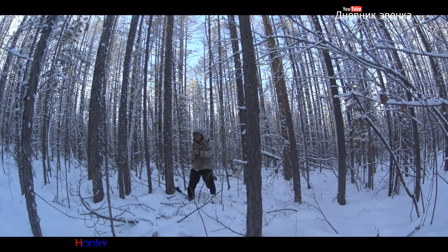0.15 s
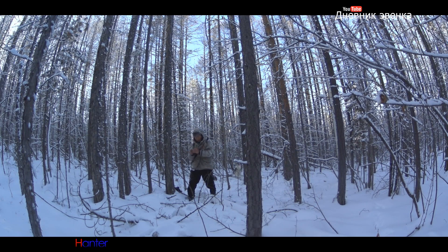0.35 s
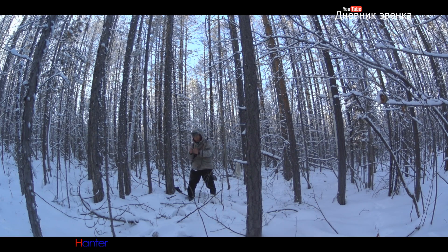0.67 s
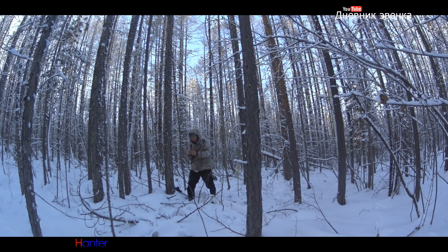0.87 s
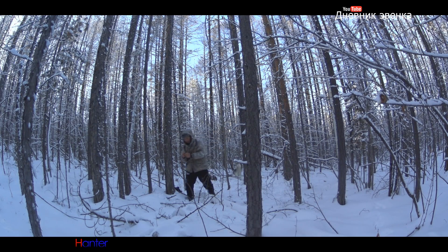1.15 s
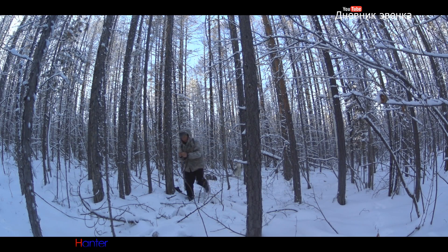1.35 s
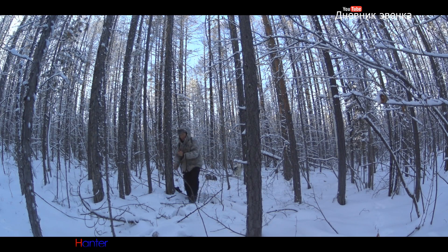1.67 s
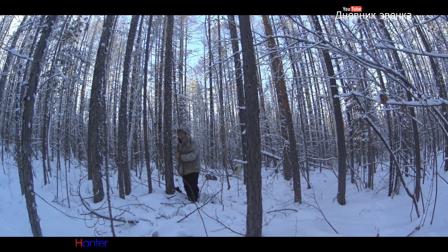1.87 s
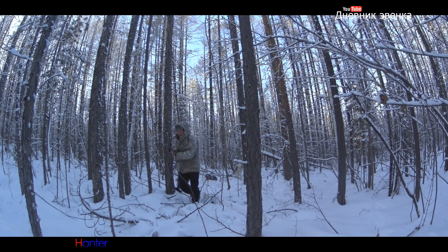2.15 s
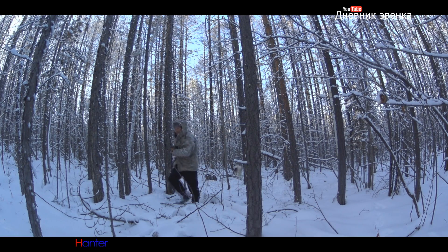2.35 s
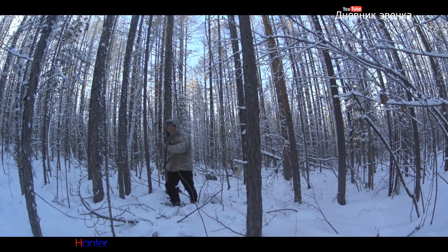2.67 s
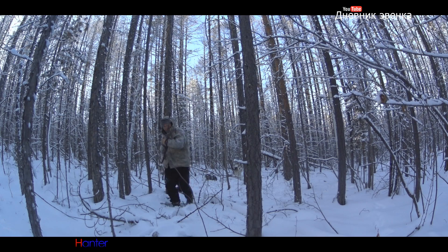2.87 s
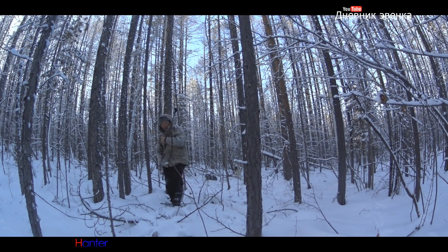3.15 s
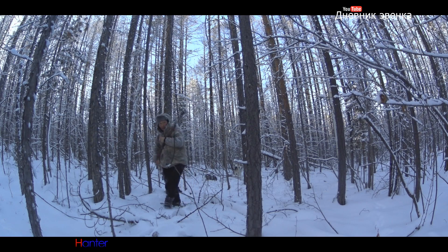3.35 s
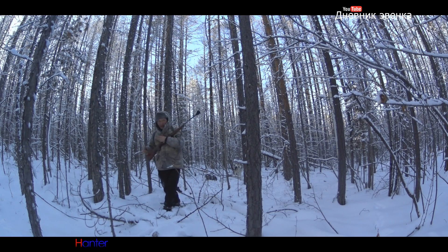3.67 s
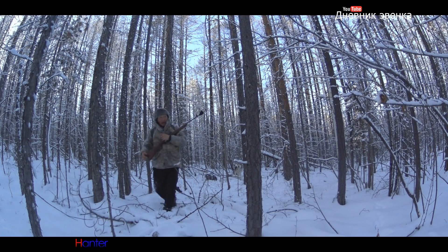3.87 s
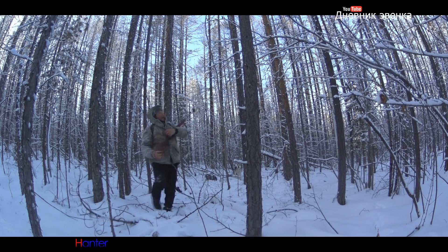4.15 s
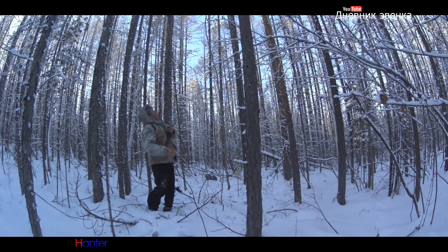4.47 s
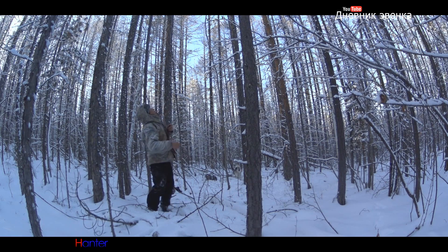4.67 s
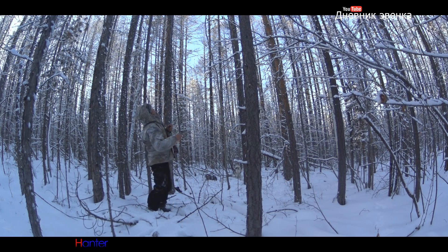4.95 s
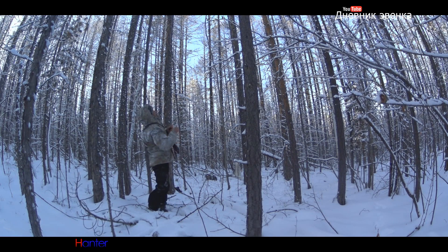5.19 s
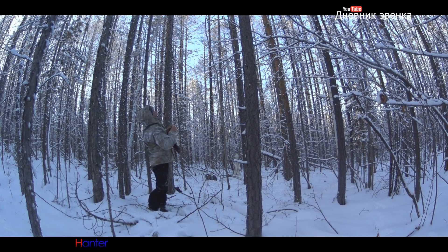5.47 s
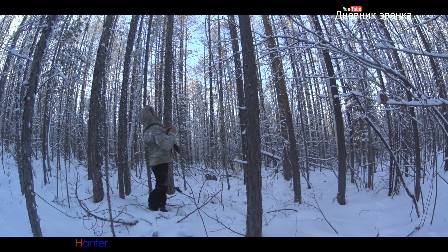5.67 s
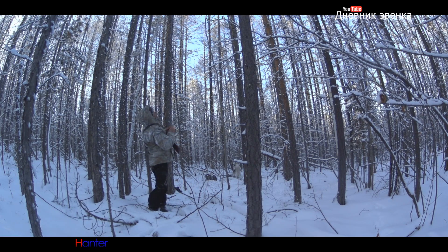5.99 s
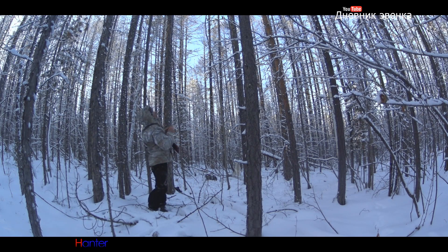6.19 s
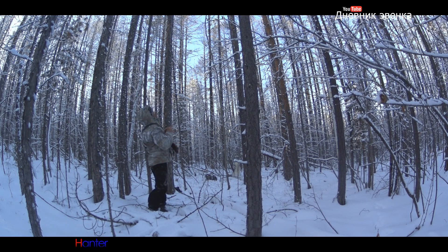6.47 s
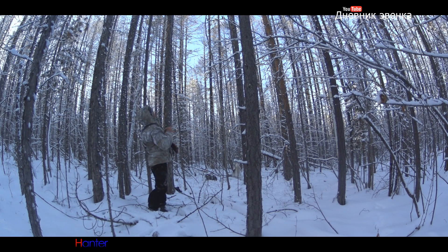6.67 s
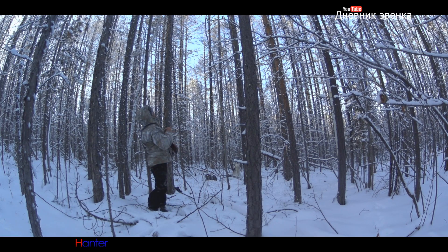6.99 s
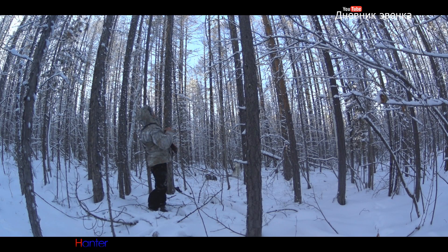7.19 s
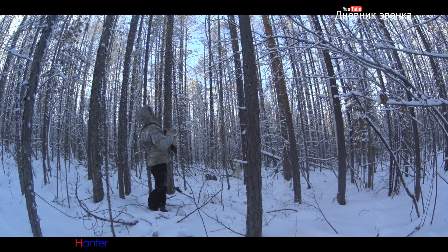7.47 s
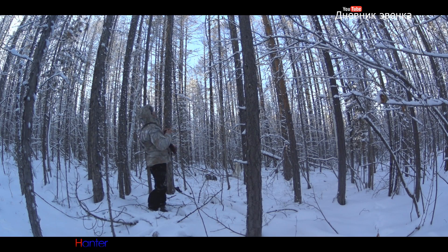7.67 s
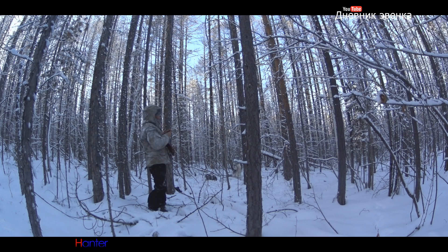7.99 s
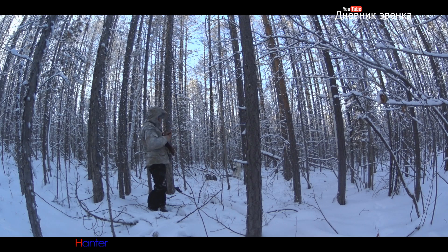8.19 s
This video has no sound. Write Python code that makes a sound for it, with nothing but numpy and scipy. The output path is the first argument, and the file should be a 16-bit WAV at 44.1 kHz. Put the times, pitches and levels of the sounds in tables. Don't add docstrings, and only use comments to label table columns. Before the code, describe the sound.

In a still snowy forest a dog some way off gives four spaced, yelping barks, each trailed by a long scattered echo off the trunks. Cloth rustles near the microphone and a twig snaps. The dog pauses while close boots crunch crusty snow with brittle ticks and sleeve swishes. Then it barks on in loose pairs to the end, with one squeak of cold snow, over faint hiss.

```python
import sys
import numpy as np
from scipy import signal
from scipy.fft import rfft, irfft, next_fast_len
from scipy.io import wavfile
from scipy.ndimage import uniform_filter1d, minimum_filter1d, map_coordinates

SR = 44100
rng = np.random.default_rng(int(sys.argv[2]) if len(sys.argv) > 2 else 0)


def volts_from_db(level):
    exponent = np.asarray(level, float) / 20
    return 10 ** exponent


def log_audio(samples):
    frames = np.atleast_2d(samples).T
    limited = np.clip(frames, -1, 1)
    pcm = np.round(limited * 32767).astype(np.int16)
    wavfile.write(sys.argv[1], SR, pcm)


N = 367353

# f/Hz, likeness/(0-1)
NEAR_ALIKE = [(60, 1), (170, 0.68), (480, 0.43), (1350, 0.44), (3810, 0.28), (10800, 0.92)]


def dog():
    # t/s, length/s, flip to head after start/s, chest return/share of length, its level/dB
    barks = [
        (-0.024, 0.16, 0.054, 0.63, -29),
        (0.519, 0.16, 0.04, 0.63, -27.5),
        (1.213, 0.16, .065, 0.55, -41),
        (2.411, 0.16, 0.044, 0.71, -30.5),
        (4.734, 0.16, .032, 0.65, -20.5),
        (5.188, .157, 0.043, 0.77, -23),
        (6.001, .162, 0.044, 0.63, -22.5),
        (6.619, 0.16, 0.054, .5, -21),
        (7.465, .163, 0.062, 0.699, -21.5),
        (7.995, 0.16, 0.041, 0.59, -22),
    ]
    # after attack f/Hz, at flip f/Hz, under the head voice f/Hz, on return f/Hz
    chest_pitch = [(385, 450, 490, 485), (481, 440, 405, 480), (490, 740, 450, 415), (519.6, 610, 420, 480),
                   (499, 510, 425, 520), (526, 580, 610, 500), (490.2, 530, 590, 590), (490, 580, 570, 630),
                   (546, 560, 470, 520), (464.6, 520, 590, 640)]
    # first f/Hz, middle f/Hz, last f/Hz
    head_pitch = [(870, 975, 900), (790, 860, 800), (930, 870, 810), (870, 930, 870), (880, 850, 900),
                  (890, 845, 780), (900, 850, 1000), (920, 770, 850), (860, 790, 1000), (870, 880, 820)]
    # chest attack level/dB, head level/dB, head change as chest returns/dB, overtone level/dB, hiss level/dB
    efforts = [(-40, -20.5, -1, -27.5, -40.5), (-29.5, -23.5, 1.5, -27, -46), (-23, -17, -1.5, -30.5, -50),
               (-27.5, -22.5, 4.5, -28, -46.5), (-25, -23.5, -8, -29.5, -42),
               (-23.5, -21.5, -0.5, -30.5, -48.5), (-20, -23, 2, -31, -49),
               (-19.5, -18.5, -6.5, -30.5, -50.5), (-22, -16, -11.5, -29.5, -49), (-23, -23, 1.5, -32, -51)]
    roughness = [.14, .3, .3, .33, .35, .5, .5, .45, .4, .6]
    facing = [2.5, -3.5, -2.5, -3.5, -1, -6, -10, -8, -9.5, -10]
    echoes = [-46.5, -48, -46.5, -47, -48, -47.5, -47, -48, -46.5, -47]
    # t/s, pulse rate/Hz, level/dB
    growls = [
        [(.46, 110, -53), (.525, 230, -52)],
        [(1.11, 113, -57), (1.22, 230, -48)],
        [(2.234, 64, -54), (2.3, 64.4, -52), (2.385, 95, -47), (2.41, 116, -40.5)],
        [(4.7, 89, -73), (4.74, 55, -45)],
        [(5.965, 103, -59), (6.01, 121, -38)],
        [(6.575, 115, -56.5), (6.625, 194, -42)],
        [(7.425, 76, -61), (7.475, 155, -36.5)],
    ]
    out, creaks = np.zeros((2, N)), np.zeros((1, N))
    phrases = map(phrase, barks, chest_pitch, head_pitch, efforts)
    for rows, rough, facing_db, echo_db in zip(phrases, roughness, facing, echoes):
        start, voice = bark(rows, rough, facing_db)
        forest(out, start, voice, wet_db=echo_db, near_db=7.0)
    for rows in growls:
        start, voice = growl(rows)
        add(creaks, start, voice[None])
    forest(out, 0, creaks[0], wet_db=-41.5, near_db=5.5)
    return out


def phrase(timing, chest_hz, head_hz, effort):
    s, length, flip, share, back_db = timing
    early, top, under, held = chest_hz
    first, middle, last = head_hz
    chest, head, sag, over, hiss = effort
    rest_hz, onset_db, attack_s = 363.75, -28, .023
    flip_s, settle_s, release_s = 0.00924, .018, 0.0271
    before_db = -31.5
    back = np.clip(share * length, flip + settle_s + .005, length - release_s - .005)
    return [(s, rest_hz, chest + onset_db, first, head + 0.87 * onset_db, over + onset_db, hiss + 0.5 * onset_db),
            (s + attack_s, early, chest, first, head + before_db, over - 4, hiss - 5.5),
            (s + flip - flip_s, top, chest - .8, first, head + 0.73 * before_db, over, hiss),
            (s + flip, top, chest - 7, first, head, over, hiss),
            (s + flip + settle_s, under, back_db - 11, (first + middle) / 2, head, over, hiss),
            (s + back, held, back_db, middle, head + sag, over - 2.5, hiss - 1.5),
            (s + length - release_s, .94 * held, back_db - 7.5, last, head + sag - 2.5, over - 1.5, hiss - 2.5),
            (s + length, .8 * held, back_db - 14.5, last, head + sag - 11, over + 1, hiss - 14)]


def bark(rows, rough, facing_db):
    # multiple of pitch, level/dB
    head_partials = [(1, 1), (2, -30.5)]
    # f/Hz, level/dB per Hz
    teeth_spectrum = [(1650, -33), (2800, -4.5), (4040, -8), (4830, -9.5), (6760, -12), (7730, -7.5),
                      (9090, 0), (11200, -9), (14600, -45), (22000, -120)]
    # f/Hz, width/Hz, level/dB
    teeth_modes = [(4735, 370, 8), (5500, 780, 6.5), (6600, 520, 8.5), (8700, 580, -7.5)]
    start, (chest_hz, chest_db, head_hz, head_db, over_db, hiss_db) = curves(rows)
    n = len(chest_hz)
    fray = 0.42 * np.clip(abs(np.arange(n) / n / 0.56 - 1), 0, 1) ** 1.5
    rough = rough + (1 - rough) * fray
    low = swing(chest_hz, jitter=.075 * rough)
    high = swing(head_hz, jitter=.045 * rough)

    def partial(turns, shimmer_db):
        return np.sqrt(2) * volts_from_db(shimmer_db * wobble(n, 90.44)) * np.sin(2 * np.pi * turns)

    chest = partial(low, shimmer_db=5 * rough)
    head = sum(volts_from_db(db) * partial(k * high, shimmer_db=6.5 * rough) for k, db in head_partials)
    over = unit(sum(k ** .45 * abs(throat(k * chest_hz)) * partial(k * low, shimmer_db=2 + 9 * rough)
                    for k in range(2, 6)))

    puffs = 0.78 + np.cos(np.pi * low) ** 4
    throat_air, low_air, top_air = rng.standard_normal((3, n)) * puffs
    rasp = unit(filtered(throat_air, throat))
    upper = np.sqrt(1 - rough) * over + 1.35 * np.sqrt(rough) * rasp
    upper = filtered(upper, lambda f: volts_from_db(facing_db / (1 + (1800 / (f + 1)) ** 8)))

    top_air = top_air * volts_from_db(2.5 * wobble(n, 40) - 40 * np.arange(n) / SR)
    buzz = unit(sum(partial(k * low, shimmer_db=6) for k in range(9, 16)))
    low_air = low_air + 1.1 * (1 - rough) * buzz

    def teeth(hz):
        colour = volts_from_db(along(teeth_spectrum, hz)) * (0.43 + abs(rings(hz, teeth_modes)))
        return colour * np.array([hz < 7300, hz >= 7300])

    flutter = volts_from_db(3.24 * wobble(n, 160.5))
    hiss = unit(filtered(np.array([low_air, top_air]) * flutter, teeth).sum(0))

    def ending(fall_s):
        return np.clip(np.arange(n)[::-1] / SR / fall_s, 0, 1) ** 2

    voice = volts_from_db(chest_db) * chest + volts_from_db(head_db) * head + volts_from_db(over_db + 6.5) * upper
    return start, voice * ending(.016) + volts_from_db(hiss_db + 2.5) * hiss * ending(.03)


def throat(f):
    # f/Hz, width/Hz, level/dB
    throat_modes = [(436, 104, -6), (600, 173, -1.5), (829, 258, 1.5), (1180, 340, -3.5), (1543, 107, -1),
                    (2006, 206, -10), (2265, 187, -13), (2700, 240, -23.5)]
    return rings(f, throat_modes) / (1 + (330 / (f + 1)) ** 6) / (1 + (f / 2700) ** 6)


def growl(rows):
    # f/Hz, width/Hz, level/dB
    muzzle_modes = [(364, 47, 5), (740, 450, -2), (1300, 120, -5.5), (1554, 69, 2)]
    start, (rate, db) = curves(rows)
    n = len(rate)
    turns = np.cumsum(rate * (1 + .07 * wobble(n, 56.8))) / SR
    slaps = np.diff(np.floor(turns), prepend=-1) * volts_from_db(db + 46 + 3.9 * wobble(n, 54.0))
    slaps = np.pad(slaps, (0, 2000))

    def muzzle(f):
        body = rings(f, muzzle_modes) / (1 + 1j * f / 1100) ** 2 / (1 + (260 / (f + 1)) ** 4)
        return body + rings(f, [(5440, 350, -14)]) ** 2

    return start, filtered(slaps, muzzle)


def forest(out, start, voice, wet_db, near_db):
    # f/Hz, t60/s, level/dB
    trunks = [(293, 1.09, -1.5), (690, 1.75, -2.5), (905, 1.53, -1.5), (1160, 1.34, -4), (1850, 1.236, 0.5),
              (2630, 0.94, 3.5), (5000, 0.55, 3.5), (6700, 0.32, 1), (10000, 0.11, 3.5)]
    # f/Hz, likeness/(0-1)
    echo_alike = [(300, 0.9), (1000, 0.48), (2500, 0.46), (6000, 0.75)]
    hz, t, z = signal.stft(rng.standard_normal((2, SR * 3 // 2)), SR, nperseg=256)
    lumps = volts_from_db(2.5 * wobble(SR * 2, 45)[(t * SR).astype(int)])
    t60 = along([(f, s) for f, s, _ in trunks], hz)[:, None]
    db = along([(f, level) for f, _, level in trunks], hz)[:, None]
    far = volts_from_db(-60 * t / t60)
    near = volts_from_db(near_db - 60 * t / 0.36)
    tail = signal.istft(z * lumps * volts_from_db(db) * (far + near), SR, nperseg=256)[1]
    rise = np.clip(np.arange(tail.shape[1]) / (0.0063 * SR), 0, 1)
    tail = paired(tail, echo_alike) * rise
    heard = signal.fftconvolve(voice[None], volts_from_db(wet_db) * tail, axes=1)
    heard[:, :len(voice)] += voice
    add(out, start, heard)


def footsteps():
    # t/s, peak level/dB, f/Hz
    crust_snaps = [(3.257, -46, 6730), (3.276, -44, 8600), (3.2949, -38, 7200), (3.317, -36, 9250),
                   (3.3375, -41.5, 8700), (3.4062, -46, 8700), (3.427, -43, 8350), (3.5229, -49, 4340),
                   (3.563, -52, 7750), (3.6756, -41.5, 5730), (3.761, -46, 3500), (3.796, -42.5, 3000),
                   (3.805, -43, 3160), (3.8667, -34, 2980), (3.899, -31, 3000), (3.923, -32.5, 3120),
                   (3.9355, -33, 2860), (3.9664, -39, 7240), (4.0463, -43, 8430), (4.084, -38, 7800),
                   (4.116, -41, 7700), (4.1732, -32.5, 3130), (4.1845, -31.5, 2970), (4.2257, -36, 3000),
                   (4.2487, -33.5, 3000), (4.261, -36, 2920), (4.3685, -42, 7200), (4.4003, -33, 3140),
                   (4.667, -45, 2700), (4.703, -45, 4720)]
    # t/s, peak level/dB, f/Hz
    twigs = [(0.99, -49, 8000), (1.0564, -34.5, 6270), (1.0912, -41.5, 5000), (1.367, -32, 5900),
             (1.9305, -24.5, 3000), (2.374, -45.5, 2500), (4.9297, -62, 5050), (4.9646, -35.5, 3200),
             (5.0356, -31, 8700), (5.1735, -38, 5460), (5.4288, -42, 4710), (5.4944, -40, 3060),
             (5.7035, -49, 5560), (6.1236, -31, 4800), (6.219, -49, 5030)]
    # t/s, peak level/dB, f/Hz
    crunches = [(3.355, -47, 890), (3.387, -39, 850), (3.415, -45, 861), (3.45, -48, 420),
                (3.472, -46, 443), (3.505, -54.5, 765), (3.529, -42.5, 580), (3.562, -40.5, 693),
                (3.583, -42, 446), (3.608, -44, 510), (3.648, -39.5, 479), (3.687, -39.5, 550),
                (3.705, -41.5, 382), (3.746, -46.5, 790), (3.784, -40.5, 894), (3.869, -34.5, 980),
                (3.901, -36.5, 765), (3.925, -36, 820), (3.944, -37, 600), (4.053, -60, 1290),
                (4.105, -41, 353), (4.171, -33.5, 630), (4.228, -35, 654), (4.25, -34, 630),
                (4.285, -48, 969), (4.348, -54, 557), (4.395, -37, 870), (4.61, -40.5, 1100),
                (4.646, -41, 330), (4.7, -40.5, 393)]
    # t/s,
    # peak level/dB, f/Hz
    ticks = [(1.5694, -63, 2780), (1.6844, -62, 4410), (2.332, -41.5, 4470), (2.3945, -42.5, 5690),
             (2.654, -29, 2640), (2.8744, -52, 3780), (3.24, -52, 6550), (3.2774, -45.5, 10600),
             (3.2774, -37, 9220), (3.3454, -44, 9430), (3.3624, -44, 5970), (3.3774, -36, 7930),
             (3.428, -37.5, 8830), (3.4514, -43, 6770), (3.4634, -36, 8880), (3.5237, -44, 4380),
             (3.5404, -43, 8070), (3.5704, -48, 8780), (3.5776, -42, 7830), (3.748, -38.5, 2550),
             (3.7756, -39, 3500), (3.7873, -40, 2890), (3.7945, -29, 2960), (3.8024, -36, 3910),
             (3.8116, -32, 3020), (3.8224, -34, 2970), (3.8344, -30.5, 3370), (3.8464, -32, 2910),
             (3.8858, -37, 3670), (3.9136, -35.5, 2980), (4.0815, -26, 7860), (4.1014, -37, 7880),
             (4.196, -46, 9170), (4.2124, -34, 8840), (4.2334, -35, 2990), (4.2864, -47, 8210),
             (4.3216, -43, 7910), (4.4028, -37, 2920), (5.5114, -52, 4820)]
    # t/s, peak level/dB, f/Hz
    squeaks = [
        (4.055, -48, 1300),
        (4.5, -50.5, 1300),
        (5.2, -27, 1490),
    ]
    out = snaps(crust_snaps, t60=.012, share=.2, spread=.14, rise_s=.002)
    out += snaps(twigs, t60=.01, share=.3, spread=.5)
    out += snaps(crunches, t60=.018, share=.4, spread=.04, rise_s=.001)
    out += snaps(ticks, t60=.004, share=.5, spread=.3, rise_s=.0002)
    return out + snaps(squeaks, t60=0.065, share=0.056, spread=.01)


def snaps(events, t60, share, spread, rise_s=0.0054):
    out, t = np.zeros((2, N)), np.arange(2048) / SR
    f = np.fft.rfftfreq(2048, 1 / SR)
    shape = volts_from_db(-60 * t / t60) * (1 - np.exp(-t / rise_s))
    for s, db, hz in events:
        burst = [[1, 0.38], [1, 0.068]] @ rng.standard_normal((2, len(t))) * shape
        colour = 1 / (1 + ((f - hz) / (share * hz)) ** 2) + spread * f / (f + hz)
        crack = irfft(rfft(np.roll(burst, 128, 1)) * colour)
        add(out, round(s * SR) - 128, volts_from_db(db) * crack / abs(crack).max())
    return out


def boot_scrapes():
    # t/s, level/dB
    drags = [
        [(3.765, -53), (3.785, -45.5), (3.83, -49), (3.86, -56)],
        [(4.43, -65), (4.5, -52), (4.6, -57.5)],
        [(3.6, -64), (3.67, -56.5), (3.69, -57)],
    ]
    # f/Hz, width/Hz, level/dB
    crust_modes = [(1850, 510, -4.5), (3000, 160, 2), (3670, 390, -3), (8000, 2300, -10.5)]
    return scrapes(drags, crust_modes, grit_db=3)


def sleeve_swishes():
    # t/s, level/dB
    brushes = [
        [(3.252, -70), (3.268, -51.5), (3.3, -57.5), (3.35, -53)],
        [(3.4, -54), (3.43, -59.5), (3.47, -71)],
        [(3.61, -66.5), (3.67, -53), (3.69, -63)],
        [(3.745, -60), (3.8, -62), (3.86, -64.5)],
        [(3.955, -55), (3.97, -56.5), (3.985, -59)],
        [(4.08, -53), (4.095, -56), (4.125, -56.5)],
    ]
    # f/Hz, width/Hz, level/dB
    nylon_modes = [(5700, 700, -0.5), (7200, 600, 4), (8600, 800, 4.5), (10300, 1500, -5)]
    return scrapes(brushes, nylon_modes, grit_db=3.5)


def scrapes(strokes, body, grit_db):
    out = np.zeros((2, N))
    for rows in strokes:
        start, (db,) = curves(rows)
        n = len(db)
        grit = paired(rng.standard_normal((2, n)) * volts_from_db(grit_db * wobble(n, 350)), NEAR_ALIKE)
        add(out, start, volts_from_db(db) * unit(filtered(grit, lambda f: rings(f, body))))
    return out


def rustle():
    # t/s, cloth level/dB
    movement = [(0, -53), (.21, -70.5), (1.07, -73), (1.3, -55.5), (1.55, -73), (1.8, -68), (1.95, -58),
                (2.301, -66.5), (2.55, -57.5), (2.95, -68), (3.18, -70), (3.29, -63.5), (3.8, -54.5),
                (4.02, -58.5), (4.55, -54.5), (5.33, -63.5), (5.5, -67), (8.33, -84.5)]
    # f/Hz, level/dB per Hz
    cloth_spectrum = [(180, -17), (300, -3), (438, -11), (621, -1), (690, -6), (893, -5), (1010, -5),
                      (7790, -8.5), (11200, -14), (14600, -44), (22000, -120)]
    # f/Hz, level/dB per Hz
    tread_spectrum = [(15, -52), (25, -23), (49, 6), (113, -3), (271, 0.5), (500, 0.5), (650, -26.5),
                      (1100, -120)]
    cloth_db = np.interp(np.arange(N) / SR, *np.transpose(movement))
    tread_db = -69.5 + 0.4 * (cloth_db + 64.5)
    grit = volts_from_db(3.2 * wobble(N, 300) + 1.8 * wobble(N, 25))
    cloth = near_noise(grit, cloth_spectrum)
    tread = near_noise(volts_from_db(3.2 * wobble(N, 6.0)), tread_spectrum)
    return volts_from_db(cloth_db + 1.14) * cloth + volts_from_db(tread_db + 3.0) * tread


def still_air():
    # f/Hz, level/dB per Hz
    floor_spectrum = [(15, -45), (25, -16), (330, -24), (496, -4), (849, -2), (1180, -7.5), (1570, -15.5),
                      (11200, -24.5), (14600, -49.5), (22000, -120)]
    return volts_from_db(-61.5) * near_noise(1, floor_spectrum)


def near_noise(gain, spectrum):
    pair = paired(rng.standard_normal((2, N)) * gain, NEAR_ALIKE)
    return unit(filtered(pair, lambda hz: volts_from_db(along(spectrum, hz))))


def unit(x):
    return x / np.sqrt(np.mean(x ** 2) + 1e-20)


def along(points, hz):
    f, v = np.transpose(points)
    return np.interp(np.log(hz + 1), np.log(f + 1), v)


def curves(rows):
    s, *cols = np.transpose(rows)
    n = np.arange(max(0, round(s[0] * SR)), min(N, round(s[-1] * SR)))
    return n[0], [np.interp(n / SR, s, c) for c in cols]


def wobble(n, rate):
    knots = rng.standard_normal(int(n * 500 / SR) + 9)
    return map_coordinates(knots, [np.arange(n) * rate / SR])


def swing(hz, jitter):
    return np.cumsum(hz * (1 + jitter * wobble(len(hz), 124.66))) / SR


def rings(f, modes):
    return sum((-1) ** k * volts_from_db(db) * 1j * f * w / (c * c - f * f + 1j * f * w)
               for k, (c, w, db) in enumerate(modes))


def filtered(x, response):
    m = next_fast_len(x.shape[-1] + 8192)
    return irfft(rfft(x, m) * response(np.fft.rfftfreq(m, 1 / SR)), m)[..., :x.shape[-1]]


def paired(two, alike):
    def weights(hz):
        turn = np.arccos(np.clip(along(alike, hz), -1, 1)) / 2
        return np.array([np.cos(turn), np.sin(turn)])

    mid, side = filtered(two, weights)
    return np.array([mid + side, mid - side])


def add(out, start, part):
    out[:, start:start + part.shape[1]] += part[:, :N - start]


def scene():
    walker = footsteps() + boot_scrapes() + sleeve_swishes() + rustle()
    return dog() + walker + still_air()


def band_limit(x):
    return signal.sosfilt(signal.butter(12, 11350, fs=SR, output="sos"), x)


def record(dry):
    # f/Hz, left's lead/rad
    left_lead = [(0, -1.8), (340, -0.69), (860, -0.83), (1720, -0.88), (2840, -1.36), (4050, -0.73),
                 (5000, -0.39), (6030, -0.12), (6290, -0.68), (8700, -0.27), (10900, -0.8)]
    # f/Hz, left over right level/dB
    balance = [(60, 0.5), (110, 1), (190, 0), (340, 1), (600, 0), (1070, -2.5), (1910, -1), (3390, -0.5),
               (6040, 0), (10800, 1.5)]
    limit = .25
    need = np.minimum(1, limit / (abs(dry).max(0) + 1e-9))
    gain = uniform_filter1d(minimum_filter1d(need, size=41), size=31)
    x = dry * gain
    x = x + (.012 + .055 * (1 - gain)) * x ** 2

    def microphones(hz):
        half = volts_from_db(along(balance, hz) / 2) * np.exp(.5j * along(left_lead, hz))
        return np.array([half, 1 / half]) * hz / (hz + 25) * (hz < 11080)

    return band_limit(filtered(x, microphones))


dry = scene()
out = record(dry)
log_audio(out)
```